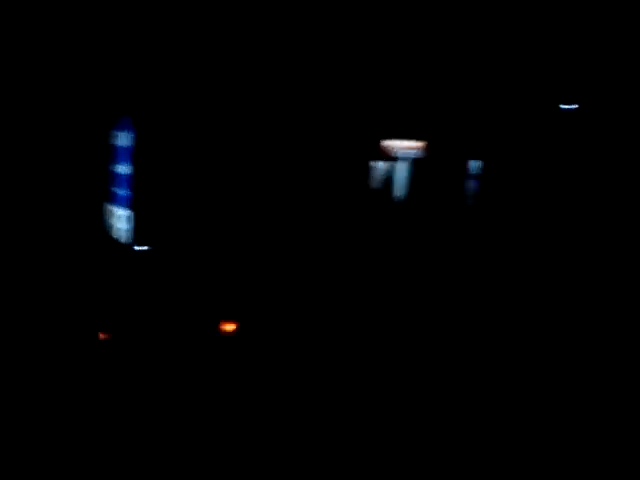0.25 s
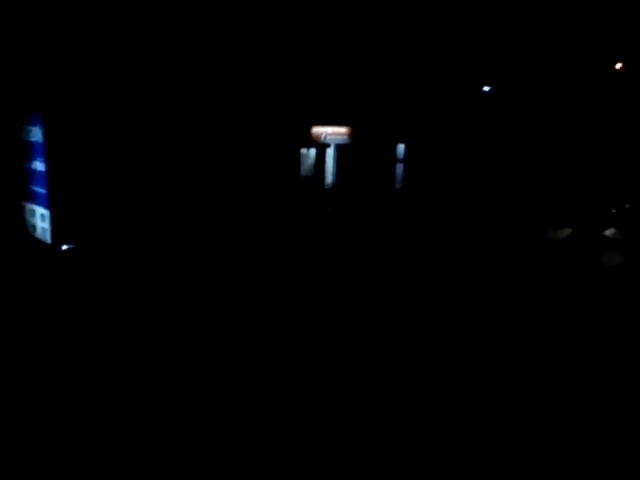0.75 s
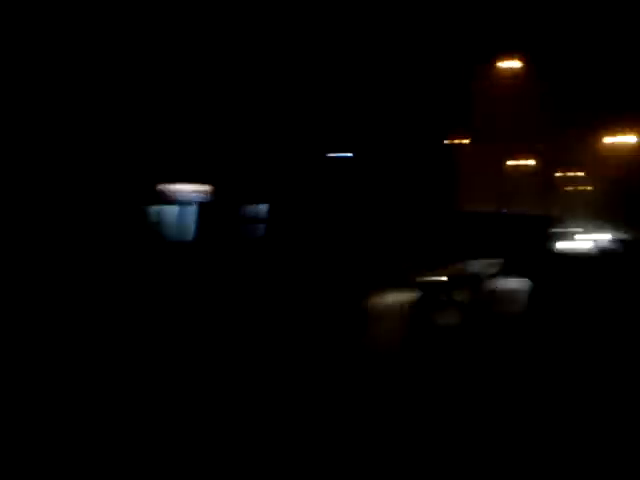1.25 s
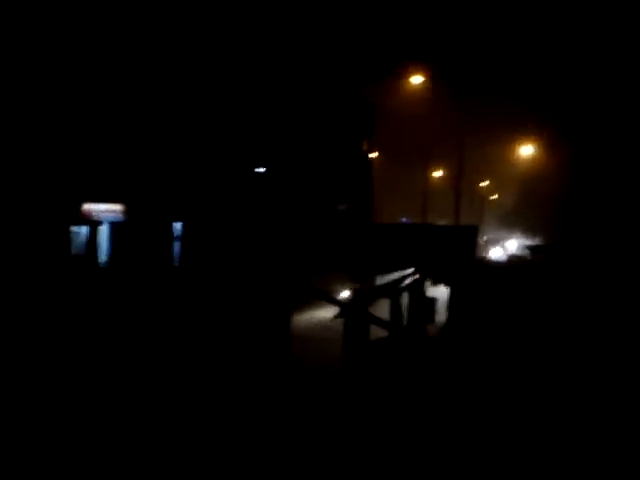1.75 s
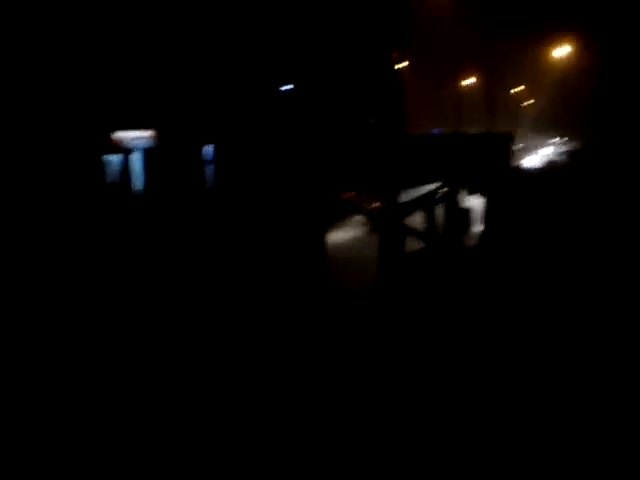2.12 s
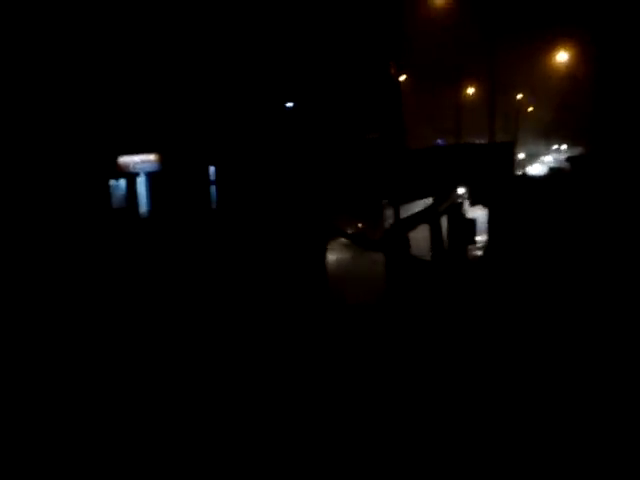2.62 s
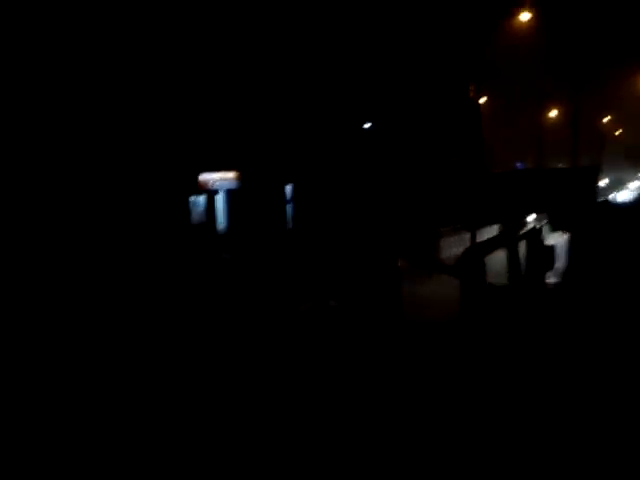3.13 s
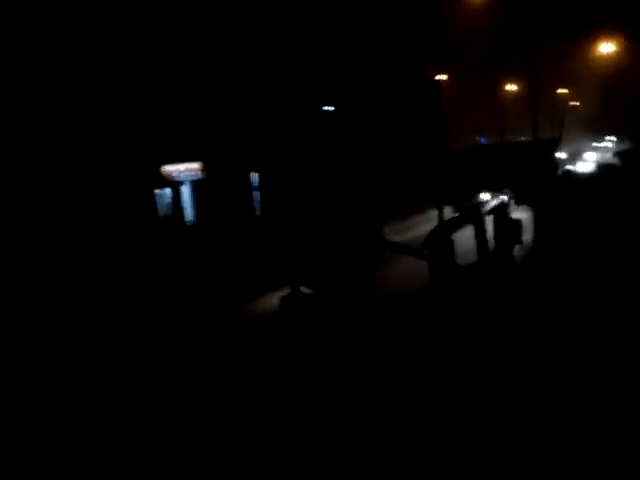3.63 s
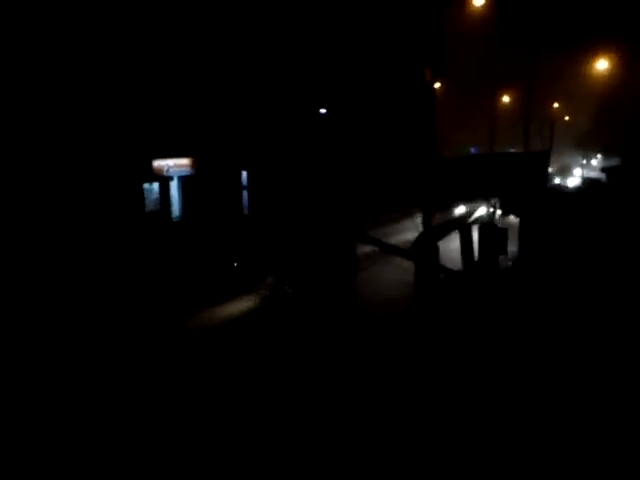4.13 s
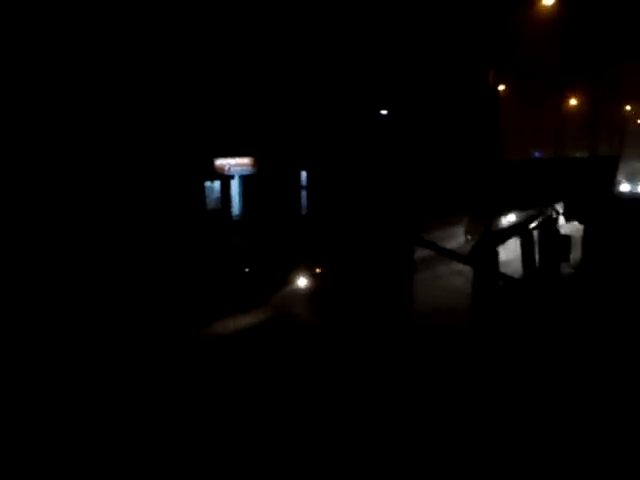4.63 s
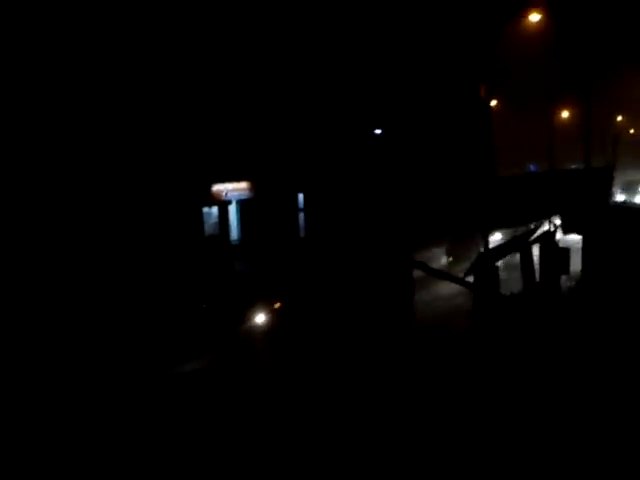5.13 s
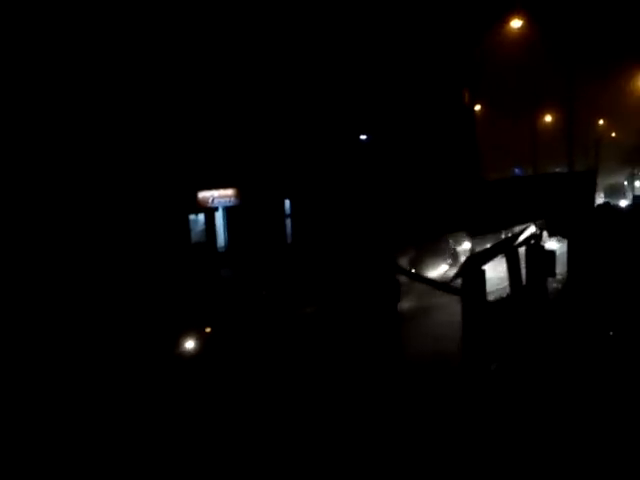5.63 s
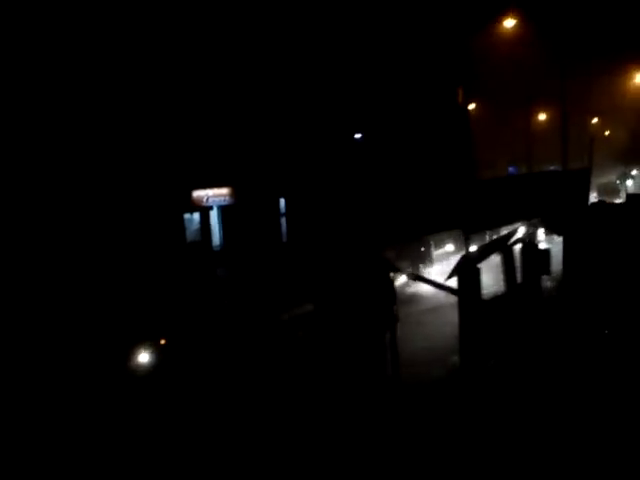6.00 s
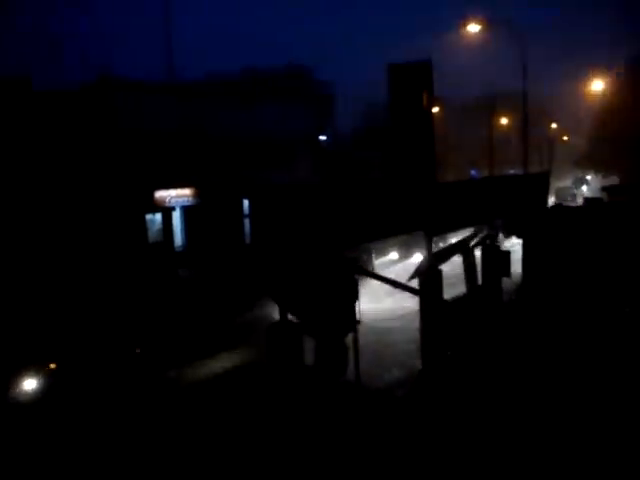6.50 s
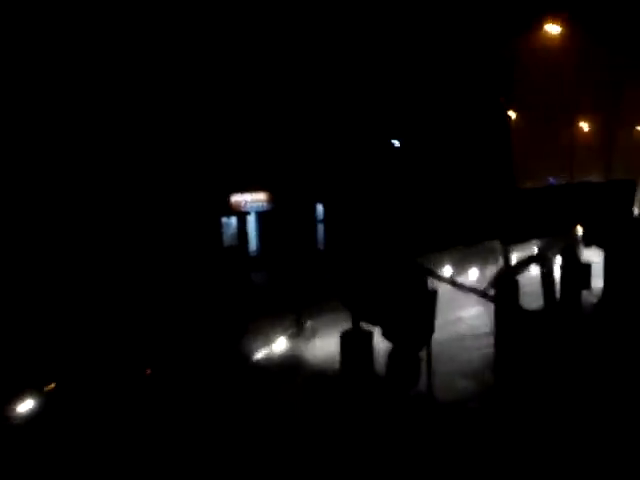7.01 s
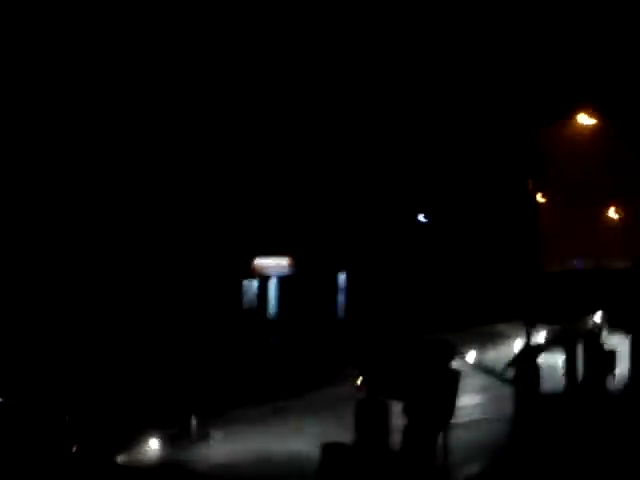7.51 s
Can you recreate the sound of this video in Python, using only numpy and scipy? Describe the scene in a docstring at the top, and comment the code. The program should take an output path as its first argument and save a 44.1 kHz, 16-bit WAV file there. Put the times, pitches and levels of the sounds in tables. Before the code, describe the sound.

A thin pocket-recorder sound of a wet street: dense rain wash, uneven low rumble and passing tyres. A close horn bursts in abruptly, high and buzzing, distorted by overload, and cuts off sharply into a noisy, wavering street echo. Rain recovers and grows stronger, with a faint wavering engine hum underneath. Near the end a clipped, high beep of a horn sounds once with a short tail, then rain and traffic continue.

```python
"""Night street in heavy rain, heard through a narrow-band pocket recorder.
A vehicle horn blares close by: a strong pair of sines at its resonance, a higher note, noise rasp.
Weak tones sound under the pair. Later a horn gives one short toot; both echo as a diffuse noise tail.
Rain is shaped noise plus random impacts; traffic and far thunder are shaped noise; an engine is one sine.
The horn drives the recorder into limiting and overload."""
import sys
import numpy as np
from scipy import signal
from scipy.fft import rfft, irfft, next_fast_len
from scipy.io import wavfile
from scipy.ndimage import uniform_filter1d, minimum_filter1d, map_coordinates

SR = 44100
rng = np.random.default_rng(int(sys.argv[2]) if len(sys.argv) > 2 else 0)


def dump_mix(stems):
    """Bounce the given channels to the path in sys.argv[1] as a 16-bit WAV at rate SR."""
    frames = np.atleast_2d(stems).T  # one column per channel
    limited = np.clip(frames, -1, 1)  # hard clip at full scale
    pcm = np.round(limited * 32767).astype(np.int16)
    wavfile.write(sys.argv[1], SR, pcm)


N = 342216

# Dips of the horn's strong pair of partials: t/s, depth/dB, 1/e half width/s
PAIR_DIPS = [(1.385, 3.5, 0.02), (1.487, 10.5, .009), (1.603, 4.5, .008), (1.712, 6, 0.0098),
             (1.754, 5.5, .008), (1.785, 10.5, 0.011)]
# Swing of the resonance between the pair: t/s, level of 8th over 9th partial/dB
PAIR_BALANCE = [(1.285, -15.5), (1.35, -12.5), (1.39, -9.5), (1.44, -7), (1.475, 3), (1.51, -8), (1.55, -3),
                (1.595, -4), (1.635, 5), (1.71, 4.5), (1.735, 0), (1.82, -1.5), (1.87, 10.5)]
# Weak tones sounding under the strong pair, before their trim: multiple of the pitch, level/dB
WEAK_TONES = [(1, -34.5), (2, -36.5), (4, -31.5), (5, -33.5), (7, -31), (10, -31.5)]
# Horn rasp spectrum: f/Hz, relative density/dB
RASP_SPECTRUM = [(500, -22), (2000, -22.5), (2600, -8), (3050, 2.5), (3400, -7.5), (3900, -19), (4600, -42)]
# Rain strength: t/s, level/dB
RAIN_STRENGTH = [(0, -28), (.75, -23.5), (1.25, -23), (2.45, -25), (3.15, -23.5), (4.3, -21), (4.75, -22),
                 (5.6, -20.6), (7.1, -21), (7.75, -21)]
# Far rain wash spectrum: f/Hz, relative density/dB
WASH_SPECTRUM = [(500, -17), (900, -11.5), (1150, -6.5), (1400, -1), (1620, 3), (1750, -1), (1930, -9),
                 (2300, -15), (3200, -34.5)]
# Near rain splash spectrum: f/Hz, relative density/dB
SPLASH_SPECTRUM = [(1500, -31.5), (2050, -15.5), (2500, -9.5), (2750, -5), (3000, -3), (3280, 1),
                   (3430, -5), (3600, -13), (3850, -21.5), (4150, -30), (4450, -41.5), (4650, -63.5),
                   (4900, -110)]
# Rolls of far thunder and traffic swells: t/s, rise/dB, 1/e half width/s
RUMBLE_ROLLS = [(.16, 6.5, 0.11), (.58, 0.5, 0.11), (.93, 5.5, 0.12), (1.66, 4, 0.095), (2.53, 5, 0.079),
                (3.08, 4.5, 0.31), (3.85, 2.5, .06), (4.33, 4.5, 0.047), (4.6, 7.5, 0.071),
                (5.02, 5.5, 0.074), (5.32, 3.5, .1), (6.25, 3, 0.097), (6.82, 5.5, 0.19), (7.2, 2.5, .14)]
# Rumble spectrum: f/Hz, relative density/dB
RUMBLE_SPECTRUM = [(20, -29), (40, -28), (60, -12), (78, -18), (100, -1.5), (150, 2.5), (200, -2.5),
                   (250, -8), (330, -16), (500, -37)]
# Tyres of one car going by: t/s, rise/dB, 1/e half width/s
CAR_PASS = (0.97, 2, 0.98)
# Tyre roar spectrum: f/Hz, relative density/dB
TYRE_SPECTRUM = [(150, -14.5), (300, 0), (400, -1), (520, -3), (680, -9), (900, -9.5), (1300, -18.5),
                 (2500, -32.5)]
# Reflection of the house fronts: f/Hz, gain/dB
FACADE_GAIN = [(300, -6.5), (2660, -3), (2990, -3.5), (4500, -11)]

BLAST_START_S, BLAST_STOP_S, BLAST_ATTACK_S = 1.282, 1.89, .003
BLAST_DB, BLAST_SAG_DB_PER_S, BLAST_RELEASE_DB_PER_S = 6, 10, 300
SURGE_DB, SURGE_S, SETTLE_S = 5, .06, .03  # harder push at the onset
SWING_RAD_PER_DB = .17  # phase twist of the 9th partial in a dip
UPPER_START_S, UPPER_ATTACK_S = 1.402, .012  # second, higher note
UPPER_DB, UPPER_FALL_DB_PER_S = -16, 24  # relative to the blast's force
TOOT_S, TOOT_DB, TOOT_RISE_DB_PER_S, TOOT_FALL_DB_PER_S = 5.777, 4.5, 541, 660  # at its peak
SPLASH_DB = 1.14  # near splashes over the far wash, once unshaded
SHADE_DB, TURN_S = 3.5, 1.7  # splashes are weaker until the microphone has turned to the street
TYRES_DB, RUMBLE_DB = -27.5, -24.3  # steady beds
DRONE_DB, NEAREST_S, PASS_S = -26.5, 5.7, 3.6  # engine: level when nearest, its time, time to fall 3 dB
AIR_DB, AIR_RATE_HZ = 3, 30  # waver of the echo
VOICE_CLOCK_HZ, TOP_HZ = 8000, 15900  # converter clock, output band limit


def blast(pitch_hz=332.8, upper_hz=3547, weak_trim_db=-1, rasp_db=-14.5):
    """A diaphragm whose 8th and 9th partials hit the horn's resonance, over weak tones: surge, hold, release."""
    t = clock()
    age_s = np.maximum(t - BLAST_START_S, 0)
    surge_db = SURGE_DB * (1 - ramp(BLAST_START_S + SURGE_S, SETTLE_S))
    release_db = BLAST_RELEASE_DB_PER_S * np.maximum(t - BLAST_STOP_S, 0)
    force_db = BLAST_DB + surge_db - BLAST_SAG_DB_PER_S * age_s - release_db
    dip_db = bumps(PAIR_DIPS)

    unrest = np.clip(age_s / 0.057, .3, 1)  # the pair starts steadier

    def flutter_db():
        """Independent level flutter of one partial."""
        return unrest * (2.1 * wobble(65) + 1.6 * wobble(260))

    ratio = amp(curve(PAIR_BALANCE))
    eighth = amp(flutter_db()) * tone(8 * pitch_hz, drift=0.67, drift_rate=40)
    twist_rad = SWING_RAD_PER_DB * dip_db
    ninth = amp(flutter_db()) * tone(9 * pitch_hz, drift=0.7, drift_rate=45, twist=twist_rad)
    pair = amp(-dip_db) * (ratio * eighth + ninth) / np.hypot(ratio, 1)

    weak_tones = np.zeros(N)
    for multiple, level_db in WEAK_TONES:
        weak_tone = tone(round(multiple) * pitch_hz, drift=1.4, drift_rate=60)
        weak_tones += amp(weak_trim_db + level_db + 5.4 * wobble(25)) * weak_tone

    upper_db = UPPER_DB - UPPER_FALL_DB_PER_S * np.maximum(t - UPPER_START_S, 0) + 5 * wobble(60)
    upper = tone(upper_hz, drift=0.83, drift_rate=35)
    upper = ramp(UPPER_START_S, UPPER_ATTACK_S) * amp(upper_db) * upper

    # uneven diaphragm beat spreads a rasp around the resonance
    rasp = amp(rasp_db) * coloured(rush(patchy_db=1.5), RASP_SPECTRUM)
    return ramp(BLAST_START_S, BLAST_ATTACK_S) * amp(force_db) * (pair + upper + weak_tones + rasp)


def toot(pitch_hz=336.2, rasp_db=-17, rasp_s=0.055):
    """A tap on a horn, nearly all 9th partial: it swells and dies at once, inside a slightly longer rasp."""
    since_s = clock() - TOOT_S
    level_db = TOOT_DB + np.minimum(TOOT_RISE_DB_PER_S * since_s, -TOOT_FALL_DB_PER_S * since_s)
    ninth = tone(9 * pitch_hz, drift=0.48, drift_rate=60)
    eighth = amp(-15.5) * tone(8 * pitch_hz, drift=.4, drift_rate=85)
    rasp_gain = bumps([(TOOT_S, amp(rasp_db), rasp_s)])
    rasp = rasp_gain * coloured(rush(patchy_db=0.0), RASP_SPECTRUM)
    return amp(level_db + 1.2 * wobble(120)) * (ninth + eighth) + rasp


def street(x, t60_s):
    """The house fronts answer with a diffuse tail: decaying noise with a soft onset."""
    t = np.arange(SR) / SR
    tail = rng.standard_normal(SR) * amp(-60 * t / t60_s) * (1 - np.exp(-t / 0.039))
    echo = signal.fftconvolve(x, tail / np.linalg.norm(tail))[:N]
    return filtered(echo, lambda hz: amp(np.interp(hz, *np.transpose(FACADE_GAIN))))


def rain():
    """Countless far drops merge into a wash; nearer ones patter through it. One strength drives both."""
    wash = rush(patchy_db=1.8) + amp(-4.5) * drops(count=5000, spread_db=3.0)
    wash = amp(0.49 * wobble(6)) * coloured(wash, WASH_SPECTRUM)
    splash = rush(patchy_db=1.87) + amp(-4.5) * drops(count=6000, spread_db=3.0)
    splash_db = SPLASH_DB - SHADE_DB * (1 - ramp(0, TURN_S)) + 0.38 * wobble(20)
    splash = amp(splash_db) * coloured(splash, SPLASH_SPECTRUM)
    return amp(curve(RAIN_STRENGTH)) * (wash + splash)


def traffic(drone_hz=276.0):
    """A rolling low rumble, the roar of tyres and one wavering engine note, level set by its distance."""
    rumble_db = RUMBLE_DB + bumps(RUMBLE_ROLLS) + 0.62 * wobble(11)
    rumble = amp(rumble_db) * coloured(rush(patchy_db=1.5), RUMBLE_SPECTRUM)
    tyres_db = TYRES_DB + bumps([CAR_PASS]) + 0.48 * wobble(8)
    tyres = amp(tyres_db) * coloured(rush(patchy_db=1.66), TYRE_SPECTRUM)
    distance = np.hypot(1, (clock() - NEAREST_S) / PASS_S)  # 1 when nearest
    drone = amp(DRONE_DB + 2.9 * wobble(7)) / distance * tone(drone_hz, drift=0.55, drift_rate=12)
    return rumble + tyres + drone


def rush(patchy_db):
    """Noise with patches of random gain in time and frequency, at rms 1."""
    z = signal.stft(rng.standard_normal(N), nperseg=512)[2]
    field = uniform_filter1d(rng.standard_normal(z.shape), size=5, axis=0)
    field = uniform_filter1d(field, size=10, axis=1)
    return unit(signal.istft(z * amp(patchy_db * unit(field)), nperseg=512)[1][:N])


def drops(count, spread_db):
    """Impacts at random moments, mostly small, a few large, at rms 1."""
    when, size, sign = rng.random((count, 3)).T
    size = np.maximum(size, 20 / count)  # caps the largest
    strength = amp(-spread_db * np.log(size)) * np.sign(sign - .5)
    return unit(np.bincount((when * N).astype(int), strength, N))


def tone(hz, drift, drift_rate, twist=0):
    """A sine of rms 1 whose phase wanders by drift radians, plus any twist in radians."""
    return np.sqrt(2) * np.sin(2 * np.pi * hz * clock() + drift * wobble(drift_rate) + twist)


def coloured(x, spectrum):
    """x shaped by (f/Hz, level/dB) points, silent above the last one, at rms 1."""
    f, db = np.transpose(spectrum)

    def response(hz):
        """Gain interpolated over log frequency."""
        return amp(np.interp(np.log(hz + 1), np.log(f), db, left=db[0] - 17.0, right=-120))

    return unit(filtered(x, response))


def filtered(x, response):
    """x times a response of frequency."""
    m = next_fast_len(N + 8192)
    return irfft(rfft(x, m) * response(np.fft.rfftfreq(m, 1 / SR)), m)[:N]


def wobble(rate):
    """A smooth random curve, rate knots a second."""
    knots = rng.standard_normal(int(N * rate / SR) + 4)
    return map_coordinates(knots, [clock() * rate], mode="nearest")


def curve(rows):
    """(t/s, value) points joined by straight lines, one value per sample."""
    return np.interp(clock(), *np.transpose(rows))


def bumps(rows):
    """A sum of Gaussian humps, one for each (t/s, height, 1/e half width/s)."""
    t = clock()
    return sum(height * np.exp(-((t - s) / width) ** 2) for s, height, width in rows)


def ramp(start_s, length_s):
    """A rise from 0 to 1."""
    return np.clip((clock() - start_s) / length_s, 0, 1)


def clock():
    """The time of every sample in seconds."""
    return np.arange(N) / SR


def amp(db):
    """Decibels to gain."""
    return 10 ** (np.asarray(db) / 20)


def unit(x):
    """Scale to rms 1."""
    return x / np.sqrt(np.mean(x ** 2) + 1e-20)


def scene():
    """Horns echoing unsteadily in the street, rain and traffic all round."""
    long_horn, short_horn = blast(), toot()
    echo = street(amp(-13.5) * long_horn + amp(-12) * short_horn, t60_s=1.5)
    echo = amp(AIR_DB * wobble(AIR_RATE_HZ)) * echo
    return (long_horn + short_horn + echo + rain() + traffic())[None]


def held(db, fall_db_per_s):
    """Follow each peak at once, then sink at a steady rate."""
    fall_db = fall_db_per_s * clock()
    return np.maximum.accumulate(db + fall_db) - fall_db


def limited(x, top, recovery_db_per_s=18, lag_s=0.097, slip=0.3):
    """A slow gain control ducks under long loud sounds; a quick limiter catches most of what is left."""
    excess_db = np.maximum(20 * np.log10(np.abs(x) / top + 1e-9), 0)
    excess_db = held(excess_db, fall_db_per_s=249)
    pole = np.exp(-1 / (lag_s * SR))
    lagged_db = signal.lfilter([1 - pole], [1, -pole], np.maximum(excess_db - 2.0, 0))
    slow_db = held(lagged_db, recovery_db_per_s)
    quick_db = np.maximum(excess_db - slow_db, 0)
    quick_db = -minimum_filter1d(-quick_db, size=64)  # running maximum
    quick_db = uniform_filter1d(quick_db, size=64)
    # the deeper the cut, the more of each peak slips past
    slipped_db = np.clip(slip * (slow_db + quick_db), 0, quick_db)
    return x * amp(slipped_db - slow_db - quick_db)


def record(dry, headroom=1.003, fold_db=-0.7):
    """Gain control, a voice-band converter that overloads, clipping at the output, then the band limit."""
    top = .73
    x = limited(dry[0], top)
    splatter = np.clip(x, -top * headroom, top * headroom) - x
    # overload overtones fold about the converter's clock, back into the voice band
    folded = splatter * (1 + 2 * amp(fold_db) * np.cos(2 * np.pi * VOICE_CLOCK_HZ * clock()))
    x = x + filtered(folded, lambda hz: 1 / (1 + (2 * hz / VOICE_CLOCK_HZ) ** 20))
    clipped = np.clip(x, -top, top)
    return filtered(clipped, lambda hz: np.clip((TOP_HZ - hz) / 200 + .5, 0, 1))[None]


dry = scene()
out = record(dry)
dump_mix(out)
```